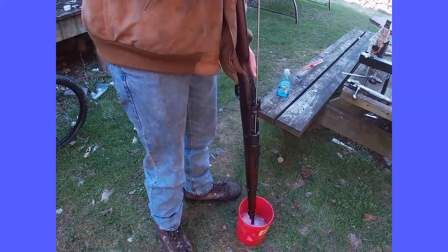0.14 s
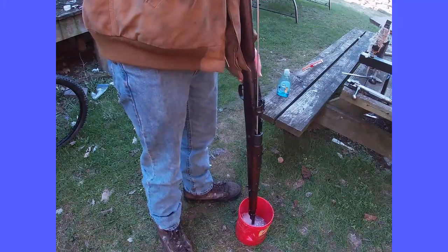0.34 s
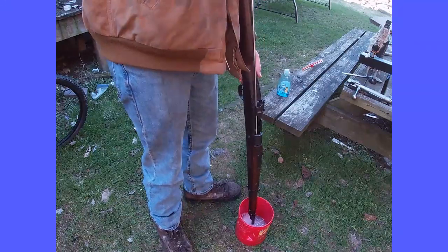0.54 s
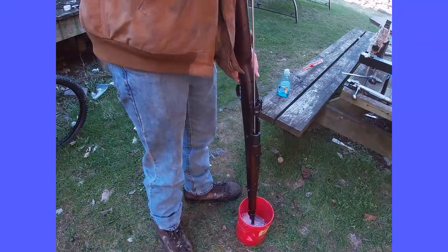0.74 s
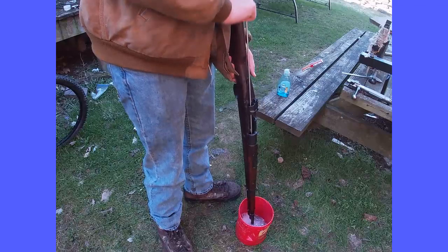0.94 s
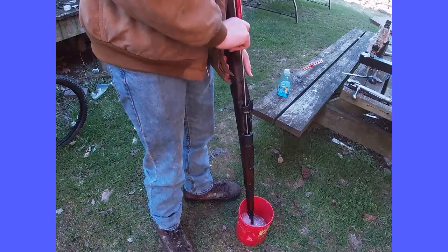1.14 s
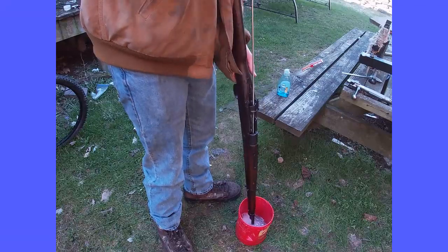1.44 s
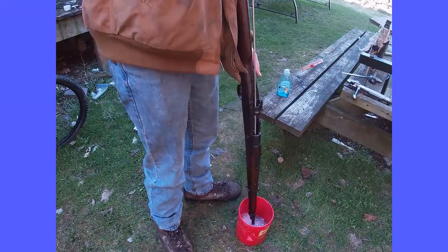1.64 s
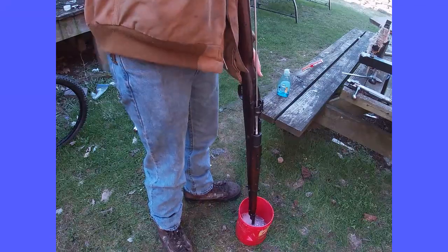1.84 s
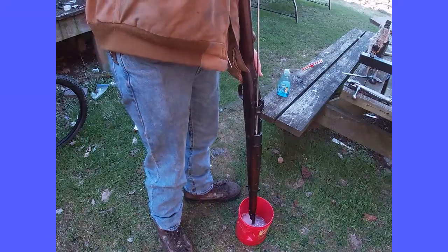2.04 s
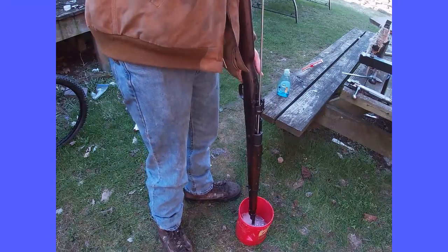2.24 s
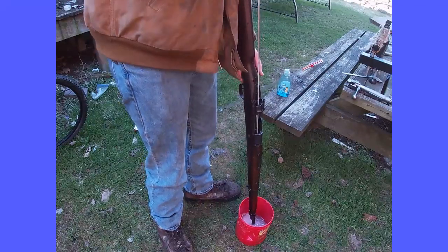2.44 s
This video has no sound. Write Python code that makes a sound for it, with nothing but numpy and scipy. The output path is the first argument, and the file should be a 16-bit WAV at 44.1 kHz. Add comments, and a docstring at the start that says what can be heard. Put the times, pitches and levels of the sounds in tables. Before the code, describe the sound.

Cleaning a rifle barrel in a bucket of suds: hissy wet strokes and short sucks, clacks around one second, a loudest knock with a wet gulp near two, then heavy wind thumping the microphone outdoors.

```python
"""A cleaning rod with a wet sponge is pumped through a rifle barrel that stands in a bucket of soapy water, outdoors.
The sponge is shaped noise with foam pops, and the sucked air and suds are narrow gliding bands of noise.
The rod's knocks and clicks are filtered crackle; each knock also rings the barrel as a set of fading sines.
Air pockets ring as rising tones, and one dry pop is a filtered jump.
Rising wind buffets the microphone with low noise and single eddies, over an outdoor background of soft noise."""
import sys
import numpy as np
from scipy import signal
from scipy.fft import rfft, irfft, next_fast_len
from scipy.io import wavfile
from scipy.ndimage import uniform_filter1d, map_coordinates

SR = 44100
rng = np.random.default_rng(int(sys.argv[2]) if len(sys.argv) > 2 else 0)


def generate_wav(sig):
    """Save sig (samples, or channels by samples) to the path in sys.argv[1] as 16-bit PCM at SR."""
    pcm = np.round(np.clip(np.atleast_2d(sig).T, -1, 1) * 32767).astype(np.int16)
    wavfile.write(sys.argv[1], SR, pcm)


N = 114660

# In the tables, t60_s is the time a sound takes to fade by 60 dB.
# Sponge sliding in the bore, before trims: time_s, hiss_db, rub_db
SPONGE_SLIDE = [ (0, -66.5, -69), (.04, -62.5, -74), (.11, -51, -49.5), (.25, -52.5, -64), (.35, -54, -50),
                (.49, -58.5, -72), (.62, -65.5, -66.5), (.7, -50.5, -51.5), (.85, -65.5, -54),
                (.97, -58, -71), (1.09, -55.5, -89), (1.17, -52, -43.5), (1.22, -75.5, -68),
                (1.3, -57, -57), (1.44, -54.5, -47.5), (1.57, -51.5, -59), (1.73, -60.5, -56.5),
                (2.2, -62.5, -63), (2.29, -54.5, -52.5), (2.45, -59, -57.5), (2.6, -55.5, -54)]
# Tone colour of the hiss: frequency_hz, gain_db
HISS_COLOUR = [(2000, -3), (4200, -5), (5800, -3), (8000, 0), (9500, -10), (11500, -23), (15000, -31)]
# Tone colour of the rubbing: frequency_hz, gain_db
RUB_COLOUR = [(300, -30.5), (900, 0), (1600, -0.5), (3000, 7), (4500, 2), (6500, -8.5), (12000, -72)]
# Strength of the wind's buffeting, before the soft ceiling: time_s, level_db
WIND_GUSTS = [(0, -62.5), (.13, -75), (.19, -59), (.86, -60.5), (.93, -44.5), (1.02, -56), (1.12, -47),
              (1.24, -33), (1.33, -43), (1.39, -39), (1.52, -45.5), (1.575, -32), (1.61, -44),
              (1.64, -27.5), (1.72, -30), (1.77, -42), (1.91, -31), (2.0, -32.5), (2.045, -46), (2.08, -25),
              (2.18, -24), (2.215, -29.5), (2.26, -12), (2.29, -13), (2.33, -34), (2.37, -18),
              (2.425, -17.5), (2.52, -36), (2.6, -26)]
# Tone colour of the buffeting: frequency_hz, gain_db
BUFFET_COLOUR = [(12, -31.5), (25, 3), (38, 3.5), (60, -3.5), (90, -8.5), (125, -12), (180, -19),
                 (260, -26.5), (400, -43), (700, -55.5), (2000, -100)]
# Single eddies on the microphone, before the push-pull shape and ceiling: middle_s, strength_db, width_s
WIND_EDDIES = [(0.8993, -22, 0.003), (1.636, -15.5, 0.0015), (1.711, -14, 0.0027), (1.8769, -18, 0.0036),
               (2.084, -16, 0.0019), (2.179, -16, 0.0024), (2.261, -21.5, 0.00095), (2.281, -9, 0.0011),
               (2.387, -12, 0.0025), (2.415, -12.5, 0.0025)]
# Tone colour of the outdoor background: frequency_hz, gain_db
AIR_COLOUR = [(30, -1), (100, -19.5), (170, 7.5), (280, -8), (450, 1), (750, -5.5), (1500, -8),
              (4000, -15.5), (9000, -51), (15000, -50)]
# Level of the outdoor background: time_s, level_db
AIR_LEVELS = [(0, -53), (.8, -54), (1.4, -59.5), (2, -61.5), (2.6, -62)]
# Air and suds sucked past the sponge: middle_s, length_s, level_db, start_hz, end_hz, half_width_hz
AIR_SUCKS = [(.014, .025, -55, 2500, 2340, 496), (.082, 0.032, -53, 3210, 3120, 600),
             (.19, .06, -52, 2500, 2387, 500), (.37, 0.11, -51, 6000, 5900, 350),
             (.69, 0.068, -51, 2050, 2317, 394), (.932, .05, -52.5, 2500, 2710, 397),
             (1.05, 0.2, -50.5, 2595, 2673, 526), (1.18, 0.026, -68, 4080, 4140, 260),
             (1.241, 0.022, -49.5, 2890, 1750, 402), (1.392, .05, -44.5, 3700, 3320, 500),
             (1.82, 0.25, -61, 4180, 4550, 400), (1.889, 0.026, -40.5, 1780, 2150, 300),
             (1.903, 0.038, -26, 2274, 1980, 300), (2.05, 0.45, -57.5, 4600, 4074, 455),
             (2.42, 0.16, -61.5, 6600, 6700, 260), (2.54, 0.22, -62.5, 3135, 2990, 300)]
# Hard knocks of the rod, before the shared contact colour:
# start_s, level_db, centre_hz, top_hz, t60_s, ring_db (barrel against knock, before BARREL_TRIM_DB)
ROD_KNOCKS = [(0.0966, -31, 2300, 8950, 0.053, -12), (0.8173, -19, 2980, 5700, 0.022, -25),
              (0.8248, -21, 2660, 9000, 0.059, -14), (.830, -24.5, 3360, 7000, 0.033, -1.5),
              (1.1486, -19.5, 2480, 4540, 0.018, -1.5), (1.1556, -27.5, 1970, 4500, 0.019, -12),
              (1.159, -26, 2250, 4630, 0.018, -10), (1.4009, -29.5, 2310, 4200, 0.038, -16),
              (1.891, -16, 2760, 11900, 0.045, -38), (1.8959, -17, 2420, 9900, 0.039, -2),
              (1.918, -6, 3170, 5640, .013, -9), (1.9188, -11, 2700, 4840, 0.02, -3.5),
              (1.9242, -17, 1550, 4000, 0.028, -10)]
# Light wet clicks in the bore, before the shared contact colour: start_s, level_db, centre_hz, t60_s
WET_CLICKS = [(.097, -24.5, 6100, 0.015), (0.123, -37.5, 2400, .015), (0.1641, -26.5, 3070, 0.013),
              (0.3476, -28.5, 5800, 0.017), (0.441, -23.5, 6000, 0.004), (.507, -32.5, 3800, 0.022),
              (0.571, -38, 5840, 0.0082), (.8245, -25.5, 7400, 0.0096), (0.8314, -22, 7100, 0.008),
              (.837, -24, 6900, 0.011), (1.063, -20, 4400, .01), (1.0697, -33, 4860, 0.0081),
              (1.090, -24.5, 4200, 0.013), (1.159, -27, 5030, 0.0095), (1.2355, -37, 2730, 0.025),
              (1.3796, -28.5, 3730, 0.022), (1.413, -14, 4160, 0.006), (1.4175, -25, 3280, 0.015),
              (1.4255, -29, 4600, 0.0072), (1.6557, -27.5, 3900, 0.033), (1.699, -25.5, 4250, 0.011),
              (1.8915, -20.5, 6000, 0.04), (1.8951, -17, 5600, 0.031), (1.986, -27.5, 6200, 0.0065),
              (2.074, -29.5, 5660, 0.0077), (2.246, -29.5, 6300, 0.015), (2.252, -32.5, 5430, 0.06),
              (2.29, -30, 6530, .025), (2.378, -31.5, 5700, .006)]
# Tone colour shared by knocks, clicks and barrel ring: frequency_hz, gain_db
CONTACT_COLOUR = [(200, -5.5), (330, 0.5), (570, -6), (820, -2), (1300, -1.5), (2000, -3), (2900, -5),
                  (4200, -8.5), (6500, -6), (8000, -6.5), (10000, -9.5), (12000, -21), (16000, -17)]
# Ways the barrel and its air column ring: pitch_hz, relative_level_db, t60_s
BARREL_MODES = [(328, -9, 0.13), (402, 1, 0.07), (761.5, -4, .14), (838, -12, 0.069), (1055, -13.5, 0.13),
                (1264, -8, 0.16), (1580, -3, 0.1), (1720, -12, 0.1), (2035, -7.5, 0.22), (2200, -25, 0.074),
                (2530, -9, 0.14), (2970, -15, 0.12), (3000, -17, 0.061), (3460, -9, 0.15), (3900, -2, 0.14),
                (4300, -16, .11)]
# Fading of the scatter from the yard: frequency_hz, t60_s
YARD_FADE = [(300, 0.5), (1500, 0.23), (4000, .16), (10000, 0.19)]
# Pockets of air ringing in the water, low gulps and high pips: start_s, level_db, pitch_hz, t60_s
AIR_POCKETS = [(.098, -33, 3020, 0.017), (.678, -41, 2050, 0.03), (.837, -26, 6950, .012),
               (1.161, -31.5, 388, 0.053), (1.166, -35.5, 454, 0.11), (1.178, -33, 187, 0.081),
               (1.218, -42, 4050, .012), (1.4007, -20, 3144, 0.026), (1.9182, -11.5, 2870, 0.013),
               (1.921, -27.5, 317, 0.092), (1.922, -27, 828, 0.082)]

RUB_TRIM_DB, HISS_FOAM_DB, RUB_FOAM_DB = -2.5, -4.5, -4
FOAM_POPS_PER_S = 900  # on average
BUFFET_CEILING = 0.4  # sample value, where 1 is full scale
KNOCK_Q, CLICK_Q = 1.24, 2.6  # a higher Q means a narrower resonance
CLICK_TOP_RATIO = 2.1  # top of a click's band over its centre
BARREL_TRIM_DB, BARREL_ATTACK_S = -6.5, 0.001
YARD_DB = -7
BUBBLE_ATTACK_CYCLES = 0.27
BUBBLE_RISE_PER_S = 0.087  # pitch rise as a fraction of the starting pitch
POP_S, POP_DB, POP_DECAY_S, POP_TOP_HZ = 2.1497, -23.5, 0.0011, 3220  # level before the low-pass
TOP_HZ = 15800


def amp(db):
    """Turn decibels into gain."""
    return 10 ** (np.asarray(db) / 20)


def unit(x):
    """Scale a sound to an average strength (rms) of 1."""
    return x / np.sqrt(np.mean(x ** 2) + 1e-20)


def along(points, hz):
    """Read a value at each frequency from (Hz, value) points on a log axis."""
    point_hz, values = np.transpose(points)
    return np.interp(np.log(hz + 1), np.log(point_hz + 1), values)


def curves(rows):
    """Draw one value per sample for each column after the time."""
    times, *columns = np.transpose(rows)
    return [np.interp(np.arange(N) / SR, times, column) for column in columns]


def wobble(rate):
    """Draw a smooth random curve through `rate` random points a second."""
    random_points = rng.standard_normal(N // 8)
    return map_coordinates(random_points, [np.arange(N) * rate / SR], mode="wrap")


def add(track, start_s, sound):
    """Mix a sound into a track at its start time."""
    i = max(0, round(start_s * SR))
    track[i:i + len(sound)] += sound[:N - i]


def coloured(x, points):
    """Give a sound the tone colour of (Hz, dB) points, with no sound ahead of its cause."""
    size = 2 * next_fast_len(N + SR // 4)
    gain = amp(along(points, np.fft.rfftfreq(size, 1 / SR)))
    # Folding the cepstrum (spectrum of the log gain) makes the filter act only forwards in time.
    cepstrum = irfft(np.log(gain))
    cepstrum[1:size // 2] *= 2
    cepstrum[size // 2 + 1:] = 0
    return irfft(rfft(x, size) * np.exp(rfft(cepstrum)))[:N]


def rush(colour, patchy_db):
    """Make coloured noise of rms 1 whose gain drifts in patches of time and pitch."""
    grid = signal.stft(rng.standard_normal(N), nperseg=512)[2]
    patches = uniform_filter1d(rng.standard_normal(grid.shape), size=3, axis=0)  # smooth over pitch
    patches = uniform_filter1d(patches, size=10, axis=1)  # smooth over time
    noise = signal.istft(grid * amp(patchy_db * unit(patches)))[1][:N]
    return unit(coloured(noise, colour))


def foam(colour):
    """Tiny bursting bubbles: coloured random clicks of uneven size, rms 1."""
    bursts = rng.random(N) < FOAM_POPS_PER_S / SR
    return unit(coloured(bursts * rng.standard_normal(N), colour))


def sponge():
    """Wet rubbing and hiss in the bore: two noises that judder together, both gritty with foam."""
    hiss_db, rub_db = curves(SPONGE_SLIDE)
    judder = wobble(70)
    hiss = rush(HISS_COLOUR, patchy_db=5.5) + amp(HISS_FOAM_DB) * foam(HISS_COLOUR)
    rub = rush(RUB_COLOUR, patchy_db=4.5) + amp(RUB_FOAM_DB) * foam(RUB_COLOUR)
    return amp(hiss_db + 1.4 * judder) * hiss + amp(rub_db + RUB_TRIM_DB + judder) * rub


def wind():
    """Low buffeting that follows the gusts, plus push-pull eddies, rounded off at the strongest."""
    gust_db, = curves(WIND_GUSTS)
    rumble = rush(BUFFET_COLOUR, patchy_db=-1)
    # Even out the noise so that the gust curve sets its strength.
    rumble /= np.sqrt(np.abs(uniform_filter1d(rumble ** 2, size=2000)) + 1e-6)
    pressure = amp(gust_db) * rumble
    t = np.arange(N) / SR
    for middle_s, strength_db, width_s in WIND_EDDIES:
        place = (t - middle_s) / width_s
        pressure -= amp(strength_db) * place * np.exp(-0.5 * place ** 2)
    return BUFFET_CEILING * np.tanh(pressure / BUFFET_CEILING)


def open_air():
    """The outdoor background: gently patchy coloured noise with a slowly changing level."""
    level_db, = curves(AIR_LEVELS)
    return amp(level_db) * rush(AIR_COLOUR, patchy_db=3)


def sucking():
    """Narrow gliding bands of noise that swell and fade as air and suds slip past the sponge."""
    out = np.zeros(N)
    for middle_s, length_s, db, start_hz, end_hz, half_width_hz in AIR_SUCKS:
        n = int(length_s * SR)
        low_pass = signal.butter(2, half_width_hz, fs=SR)
        # Keep only the end of the noise, where the filter has settled.
        flutter = signal.lfilter(*low_pass, rng.standard_normal((2, SR)))[:, -n:]
        phase = 2 * np.pi * np.cumsum(np.linspace(start_hz, end_hz, n)) / SR
        band = unit(flutter[0] * np.cos(phase) + flutter[1] * np.sin(phase))
        swell = np.sqrt(np.abs(np.hanning(n)))
        add(out, middle_s - length_s / 2, amp(db) * swell * band)
    return out


def contact(hz, t60, q, top_hz):
    """A brief fading chatter of contact through one broad resonance; starts at about rms 1."""
    t = np.arange(SR // 10) / SR
    fade = amp(-60 * t / t60)
    chatter = rng.choice([-1, 1], len(t)) * fade
    burst = signal.lfilter(*signal.iirpeak(hz, q, SR), chatter)
    burst = signal.lfilter(*signal.butter(2, min(top_hz, SR / 3), fs=SR), burst)
    return unit(burst) * np.sqrt(np.mean(fade ** 2))


def barrel(scatter_db, detune):
    """The metal and its air column ring as fading sines; each mode may vary in level and pitch."""
    t = np.arange(SR // 3) / SR
    ring = np.zeros(len(t))
    for hz, db, t60 in BARREL_MODES:
        level_chance, pitch_chance, phase = rng.standard_normal(3)
        mode_hz = hz * (1 + detune * pitch_chance)
        fade = amp(db + scatter_db * level_chance - 60 * t / t60)
        ring += fade * np.sin(2 * np.pi * (mode_hz * t + phase))
    attack = 1 - np.exp(-t / BARREL_ATTACK_S)
    return ring * attack / np.sqrt(len(BARREL_MODES) / 2)


def rod():
    """Hard rod contacts excite the barrel's ring; light wet clicks are contacts without a ring."""
    out = np.zeros(N)
    for start_s, db, hz, top_hz, t60, ring_db in ROD_KNOCKS:
        add(out, start_s, amp(db) * contact(hz, t60, KNOCK_Q, top_hz))
        ring = barrel(scatter_db=0, detune=0.013)  # only the pitch varies
        add(out, start_s, amp(db + ring_db + BARREL_TRIM_DB) * ring)
    for start_s, db, hz, t60 in WET_CLICKS:
        add(out, start_s, amp(db) * contact(hz, t60, CLICK_Q, CLICK_TOP_RATIO * hz))
    return coloured(out, CONTACT_COLOUR)


def yard(x):
    """A short, thin scatter from the ground and nearby things, made with a fading noise echo."""
    hz, t, grid = signal.stft(rng.standard_normal(SR // 3), SR, nperseg=256)
    t60 = along(YARD_FADE, hz)[:, None]
    tail = signal.istft(grid * amp(-60 * t / t60))[1]
    return signal.fftconvolve(x, tail / np.linalg.norm(tail))[:N]


def bubbles():
    """Pockets of air ring in the water as fading tones that rise a little in pitch."""
    out = np.zeros(N)
    t = np.arange(SR // 4) / SR
    for start_s, db, hz, t60 in AIR_POCKETS:
        cycles = hz * t * (1 + BUBBLE_RISE_PER_S * t / 2)
        tone = np.sin(2 * np.pi * (cycles + rng.random()))
        attack = 1 - np.exp(-t * hz / BUBBLE_ATTACK_CYCLES)
        add(out, start_s, amp(db - 60 * t / t60) * attack * tone)
    return out


def pop():
    """One dull, dry pop amid the wind: a sudden jump that dies away, with its treble softened."""
    out = np.zeros(N)
    t = np.arange(SR // 50) / SR
    add(out, POP_S, -amp(POP_DB) * np.exp(-t / POP_DECAY_S))
    return signal.lfilter(*signal.butter(3, POP_TOP_HZ, fs=SR), out)


def scene():
    """The work at the bucket, in open air and wind."""
    blows = rod()
    background = open_air()
    blows_outdoors = blows + amp(YARD_DB) * yard(blows)
    water_and_sponge = bubbles() + sponge() + sucking()
    return (blows_outdoors + water_and_sponge + wind() + pop() + background)[None]


def record(dry):
    """A very steep low-pass filter takes away the treble above the band limit."""
    low_pass = signal.ellip(10, 0.1, 90, TOP_HZ, fs=SR, output="sos")
    return signal.sosfilt(low_pass, dry)


dry = scene()
out = record(dry)
generate_wav(out)
```